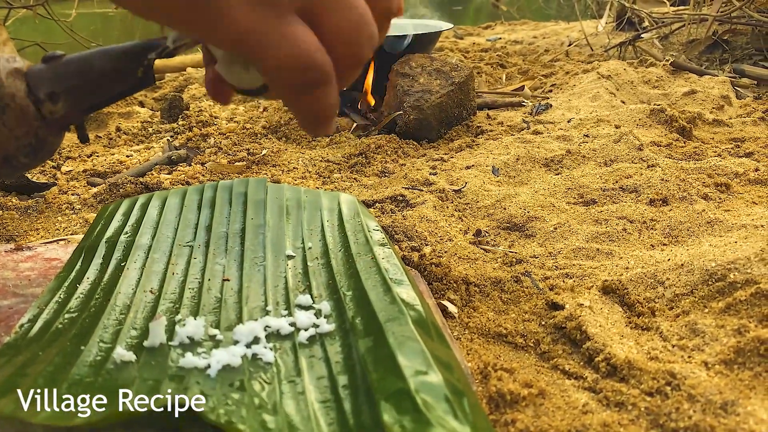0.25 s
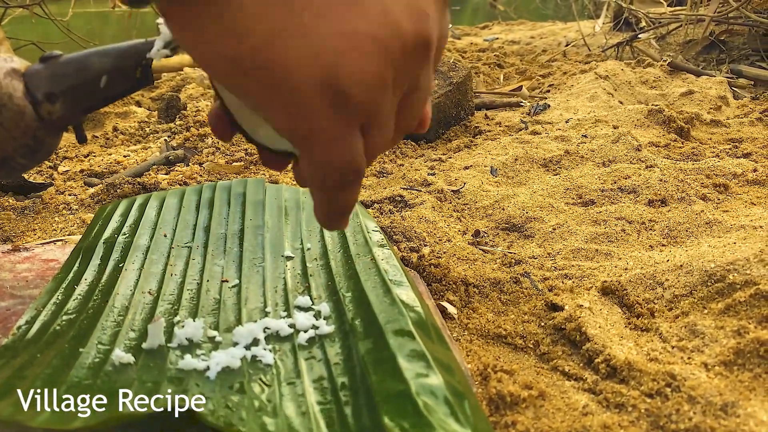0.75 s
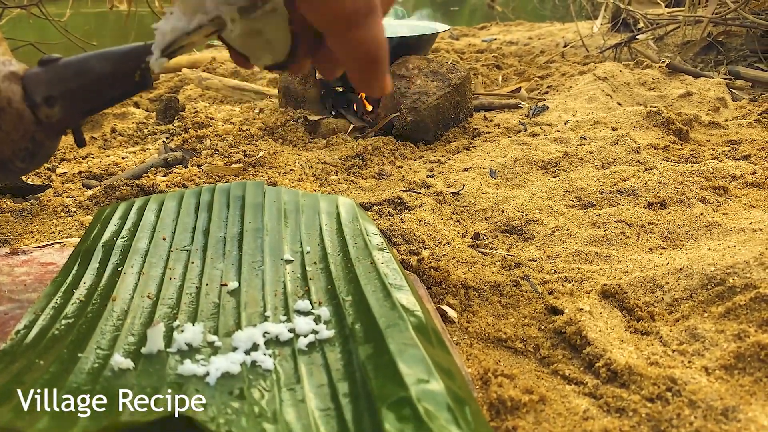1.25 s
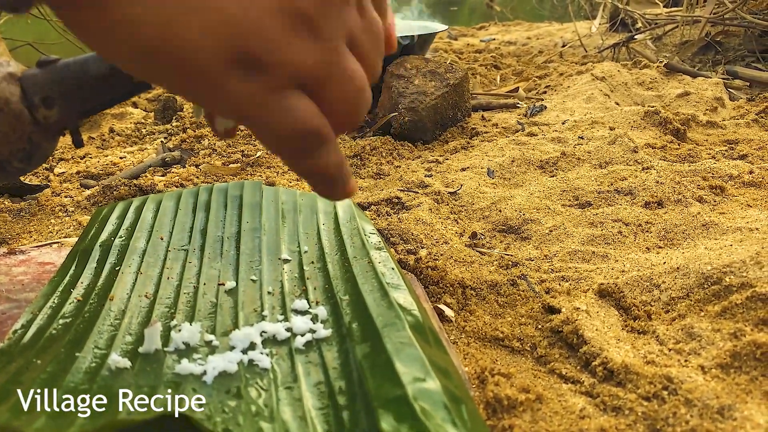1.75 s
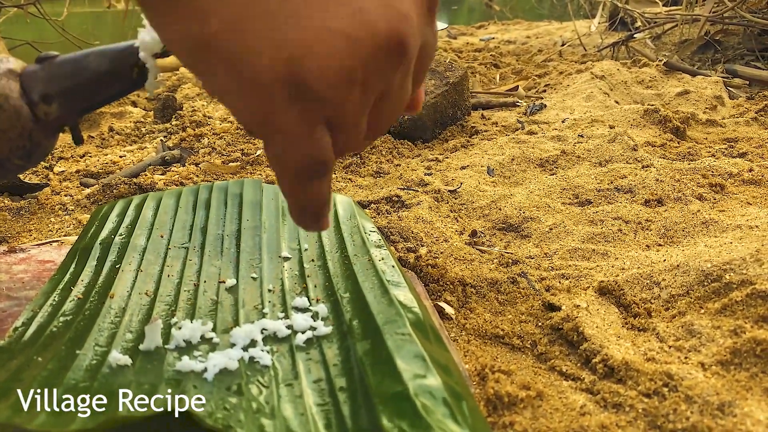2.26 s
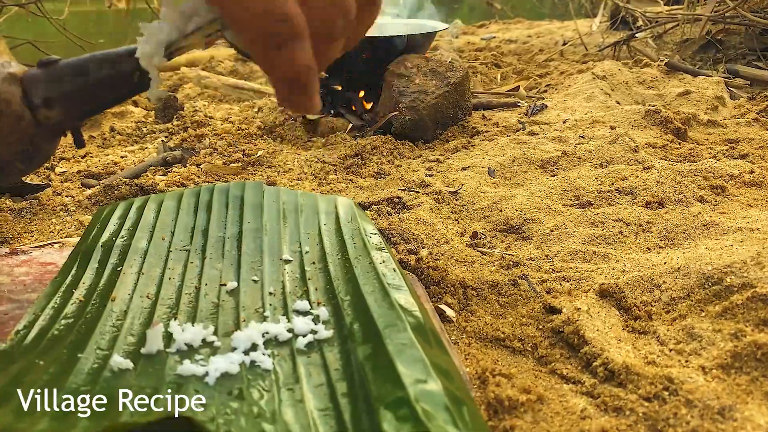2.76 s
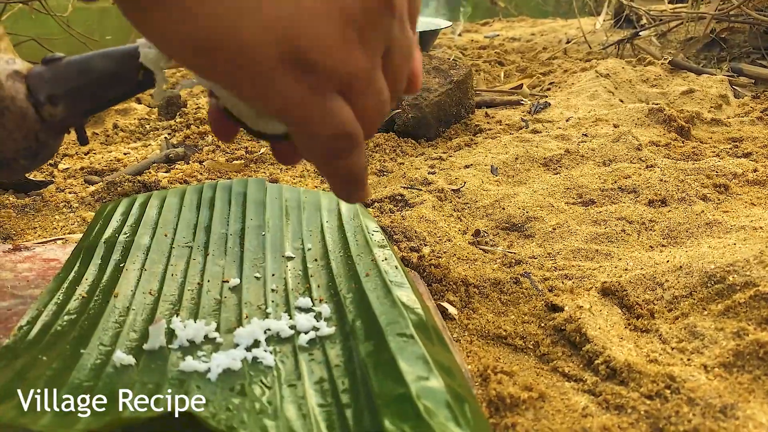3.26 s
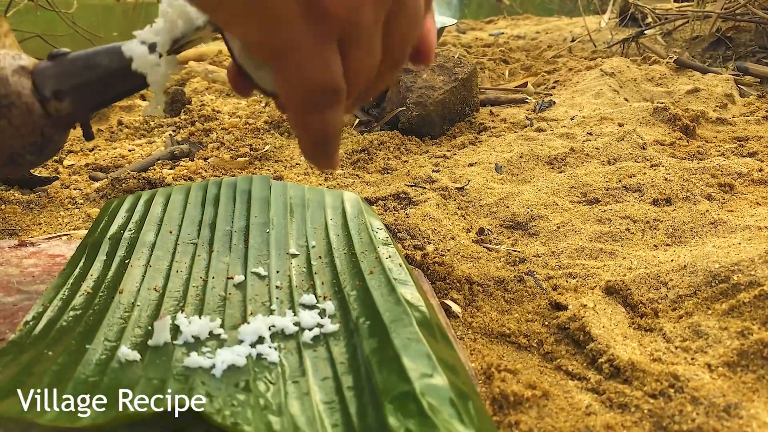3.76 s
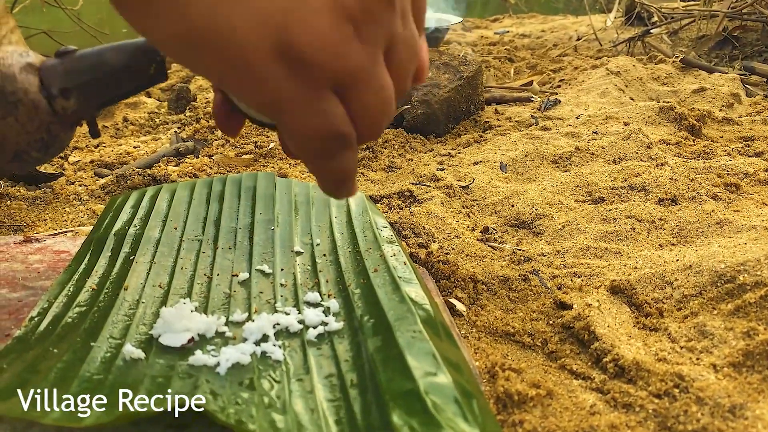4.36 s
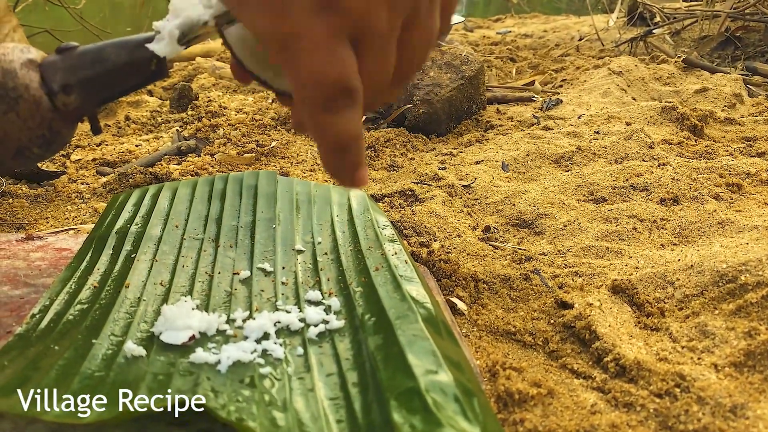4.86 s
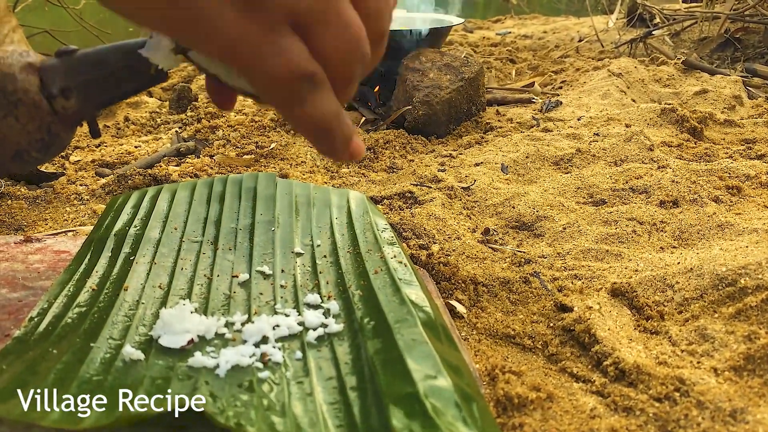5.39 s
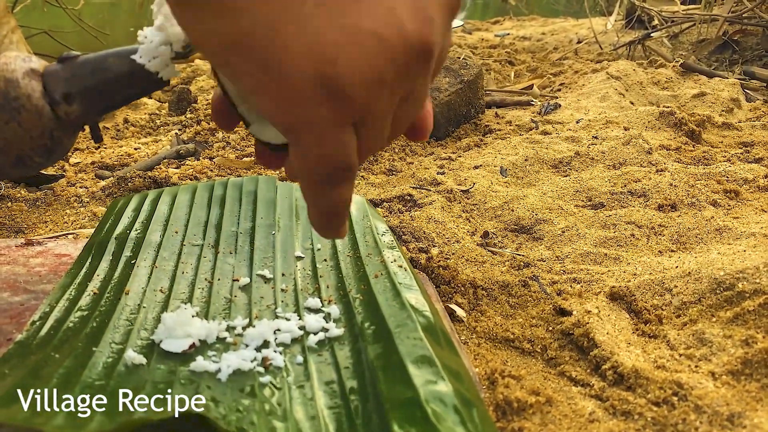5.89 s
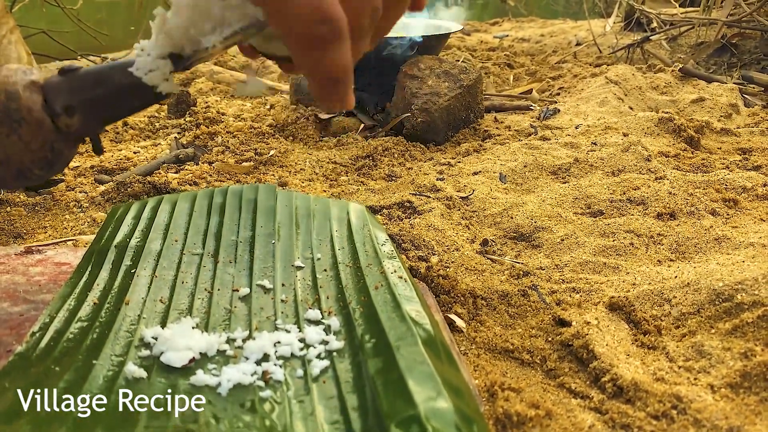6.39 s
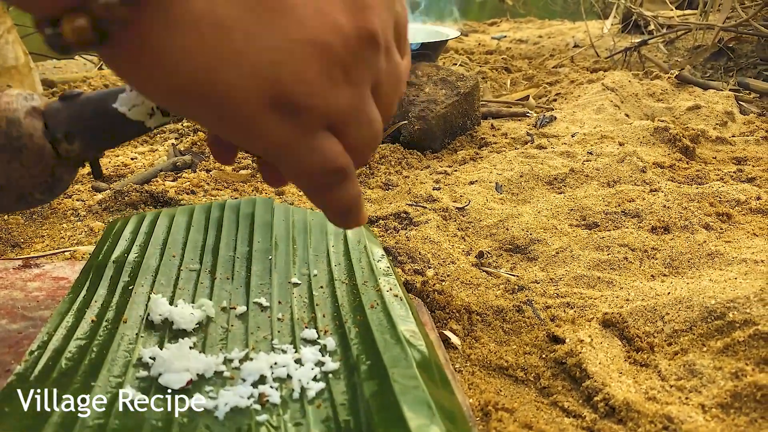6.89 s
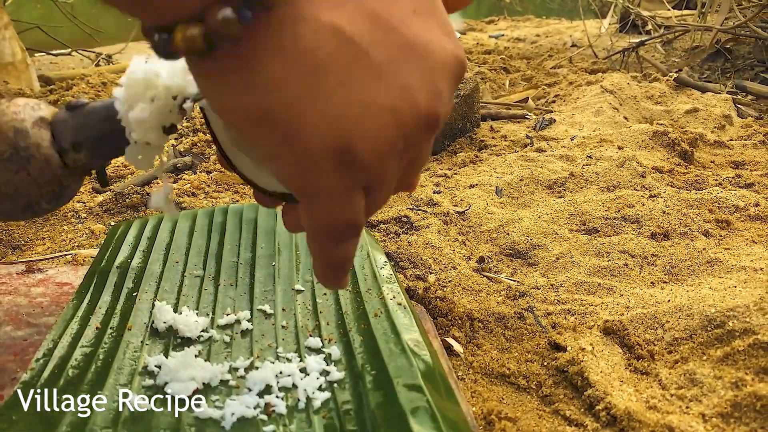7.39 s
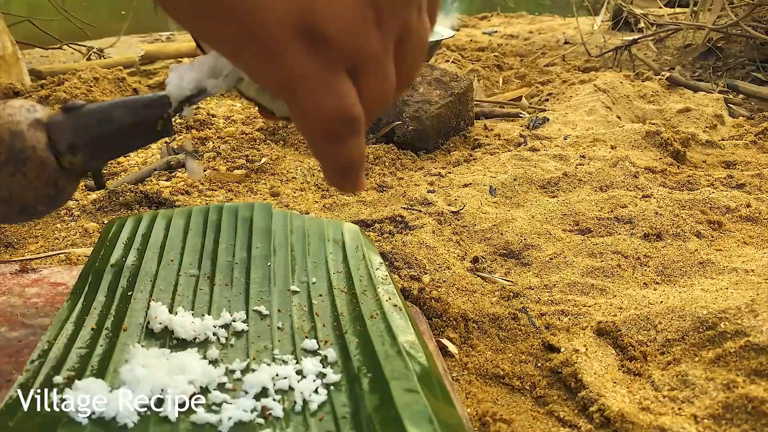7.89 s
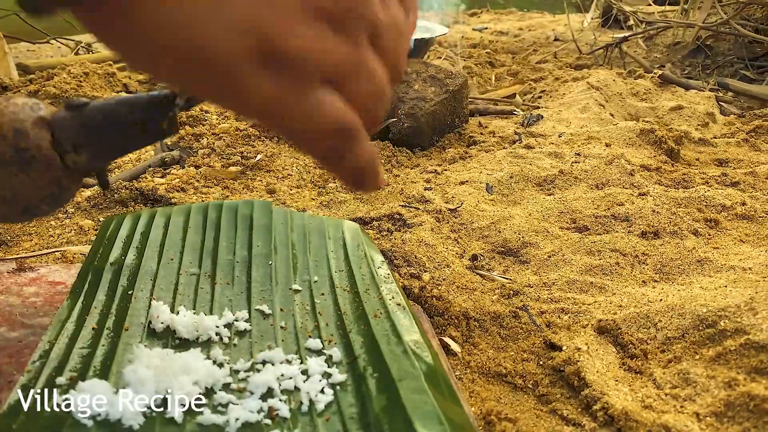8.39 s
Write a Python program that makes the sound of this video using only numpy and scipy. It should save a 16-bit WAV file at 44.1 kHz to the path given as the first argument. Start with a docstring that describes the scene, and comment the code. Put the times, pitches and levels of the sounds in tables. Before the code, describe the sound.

A hard coconut half is pushed again and again over a serrated metal scraper, close by and outdoors. Each stroke is a short, gritty, hollow rasp, nearly three a second, some catching with a woody knock. Faint ticks and rubs fill the gaps, and the stand sometimes thuds dully on sand. Close stereo microphone, dry, with a soft low air hush.

```python
"""Half a coconut is pushed down over a toothed steel scraper, nearly three strokes a second, in the open air.
The teeth stick and slip in the flesh: random impulses, shaped by the push, ring modes of shell, stand and blade.
Between strokes the shell rubs and ticks on the teeth as bursts of slips and band-passed noise.
The stand thuds on the sand as damped low modes; shaped noise makes the hush of the open air.
A close pair of microphone ports listens from the side."""
import sys
import numpy as np
from scipy import signal
from scipy.fft import rfft, irfft, next_fast_len
from scipy.io import wavfile

SR = 44100
rng = np.random.default_rng(int(sys.argv[2]) if len(sys.argv) > 2 else 0)


def unload_audio(sound):
    """Save the sound as a 16-bit wav file, at the path given as the first command line argument."""
    columns = np.transpose(np.atleast_2d(sound))
    # keep every value between -1 and 1, then stretch to whole-number steps
    steps = np.round(np.clip(columns, -1, 1) * 32767)
    wavfile.write(sys.argv[1], SR, steps.astype(np.int16))


N = 381024

# strokes: bite_s, lower_s (before bite), rise_s (to full push), ease_s, full_push_db, bite_rel_full_db,
#          eased_rel_full_db, rasp_rel_push_db, bright_db (extra treble of the rasp)
STROKES = [(0.0, 0.025, 0.029, 0.097, -16, -4.0, -17.5, -16.5, 5.5),
           (0.356, 0.0093, 0.033, 0.097, -13.5, -9.5, -15.0, -19.0, 5.5),
           (0.724, 0.019, 0.033, 0.081, -10.5, -13, -15.5, -18.5, 3),
           (1.077, 0.016, 0.062, 0.064, -11, -9.5, -15.0, -21.0, -3),
           (1.451, 0.014, 0.044, 0.071, -12, -15.5, -14, -19.0, 4),
           (1.803, 0.023, 0.072, 0.056, -15.5, -8.5, -13.5, -17.5, 1.5),
           (2.162, 0.019, 0.059, 0.079, -14, -11.5, -13, -17.5, 1),
           (2.532, 0.022, 0.038, 0.096, -12, -15, -16.5, -18, 0.8),
           (2.887, 0.022, 0.052, 0.094, -12, -15.5, -16, -17.5, 2),
           (3.264, 0.022, 0.077, 0.063, -15, -7, -15.0, -18.5, -3.7),
           (3.61, 0.023, 0.096, 0.039, -11, -13, -25, -19, -4.5),
           (3.973, 0.025, 0.09, 0.062, -13, -14, -13.5, -18.5, -0.5),
           (4.353, 0.023, 0.074, 0.074, -15.5, -3.5, -14.5, -19, 0.5),
           (4.725, 0.022, 0.069, 0.067, -12.5, -9.5, -18, -20, -2),
           (5.079, 0.021, 0.04, 0.11, -12.5, -13.5, -16.5, -18.5, 0),
           (5.456, 0.025, 0.095, 0.032, -11.5, -7.5, -17, -18, -4),
           (5.825, 0.02, 0.058, 0.082, -11.5, -8.5, -18, -17, -4),
           (6.186, 0.023, 0.052, 0.07, -9.5, -12.5, -14, -16.5, 1),
           (6.553, 0.025, 0.046, 0.095, -11.5, -11, -14.5, -16.5, -2.8),
           (6.921, 0.019, 0.065, 0.08, -12.0, -11.5, -14, -17.0, -1.8),
           (7.32, 0.019, 0.053, 0.06, -10.0, -10, -16, -18.5, -10),
           (7.693, 0.021, 0.048, 0.084, -9, -19.5, -19, -17, -2.5),
           (8.073, 0.024, 0.066, 0.076, -11.0, -13.5, -16.5, -17.5, -5),
           (8.463, 0.023, 0.042, 0.12, -13.5, -15, -13, -16, -3.3)]
# teeth catching hard in the flesh: start_s, knock_db, crack_rel_knock_db
CATCHES = [(0.356, -11, -12.5), (0.719, -2.5, -13), (0.736, 0.5, -33), (1.071, -9, -7), (1.105, -5, -37),
           (1.449, -5, -7), (1.488, 1.5, -8.5), (2.571, -11, -41), (2.606, -5, -22), (3.611, -27.5, 0),
           (3.624, -1.5, -31.5), (3.755, 3, -17.5), (4.058, -2, -25), (4.419, -19.5, -36), (4.75, -4, -9.5),
           (4.788, -1.5, -46), (5.457, -18, -27), (5.819, -7.5, -49), (5.86, 1.5, -29.5),
           (6.213, -4.5, -33), (6.563, -3.5, -29), (6.6, 1, -29), (6.957, -9, -24.5), (6.979, -1, -37),
           (7.329, -16.5, -17), (7.722, 3, -34.5), (8.114, 0, -36), (8.462, -12.5, -26), (8.489, 0, -11)]
# light ticks of shell on teeth between strokes: start_s, level_db, pitch_hz, body_rel_tick_db
TOUCHES = [(0.5771, -58.5, 1800, 21), (1.3433, -58, 1195, 17), (1.694, -45, 1570, 0),
           (1.7074, -48, 1210, 2), (1.7384, -51, 1570, 7), (1.9582, -39, 4220, -11),
           (1.9794, -39.5, 1490, -10), (2.6918, -33.5, 1400, -9.5), (2.818, -42, 2330, -8),
           (5.3712, -37, 1270, -13), (5.9599, -55.5, 4030, 6), (6.002, -38.5, 2900, 9),
           (6.0854, -31, 1410, -16), (6.3999, -34, 1350, -32), (6.8105, -41.5, 2100, -9),
           (7.2799, -43.5, 3490, -8), (7.544, -49.5, 2600, -12)]
# light rubs of shell along teeth: start_s, length_s, rasp_db, push_rel_rasp_db
RUBS = [(0.2957, 0.064, -56, 11.5), (0.6355, 0.088, -58.5, 14.5), (1.0176, 0.053, -52.5, 5),
        (1.36, 0.058, -65, 8), (1.396, 0.028, -50.5, 4), (1.965, .045, -54.5, -4), (2.0235, 0.015, -49, 13),
        (2.0617, .06, -52, -2), (2.8383, .03, -56, 1.5), (4.2822, .05, -61.5, 13),
        (5.7409, 0.03, -61.5, 6.5), (6.0975, 0.027, -50.5, -13.5), (6.4428, 0.04, -52, -5),
        (6.8214, 0.017, -52, -11), (7.2629, 0.042, -56.5, -14.5), (7.5971, 0.049, -48.5, -17)]
# dull thuds of the stand on the sand: start_s, level_db, pitch_hz
THUDS = [(0.741, -4, 61), (1.14, -18, 60.5), (1.71, -11.5, 169), (1.875, 5.5, 66.5), (2.299, -14.5, 59.2),
         (2.6, -4.5, 59), (3.58, -7, 61), (5.51, -4.5, 59.7), (5.861, -3.5, 60.4), (7.83, -4, 73.4),
         (7.87, -8.5, 56)]
# modes of shell, its air and the stand: pitch_hz, width_hz (per resonance pass), level_db
SHELL_MODES = [(62, 65, -23), (158, 49, -10.5), (250.4, 136, -3), (368, 194, 0), (466.6, 255, 2.5),
               (640, 580, -19), (804, 130, -16), (1220, 180, -16.5), (1618, 120, -11), (1821, 180, -11)]
# modes of blade and hard shell: pitch_hz, width_hz (per resonance pass), level_db
BLADE_MODES = [(2320, 500, -18), (2906, 290, -6.5), (3340, 350, -3), (4040, 760, -1.5), (4733, 600, -6),
               (5640, 570, -8.5), (6260, 250, -12.5), (7200, 1300, -7.5), (8400, 3700, -10.5),
               (10600, 1800, -21), (14000, 3500, -32.5)]
# spectral shape of the open-air hush: freq_hz, relative_density_db
AIR_SHAPE = [(15, -40.5), (25, -6.5), (74, 17), (488, -5.5), (797, -12), (1010, -4), (1520, -16),
             (2680, -17), (3300, -26.5), (7160, -40.5), (12000, -42.5), (15600, -72), (22000, -120)]
# phase by which the left port, nearer the scraper, leads: freq_hz, lead_rad
PORT_LEAD = [(0, 0), (200, 0.44), (500, 0.7137), (1290, 1.55), (1640, 3.5), (2070, 4), (2600, 8.0),
             (4000, 7.5), (5000, 5.6), (6000, 5.5), (16000, 8)]
# left port level against right: freq_hz, left_rel_right_db
PORT_LEVEL = [(60, 0.5), (110, 0.0), (200, 1), (380, 1.5), (700, 5), (1290, 2.5), (2380, 3.5), (4400, 3),
              (8120, -4), (15000, 1.5)]

# contact stages: push against full push, and extra rasp
HOVER_S, HOVER_DB, LOWER_DB = 0.012, -49, -33
LIFT_S, LIFT_DB = 0.038, -41.5
CLEAR_S, CLEAR_DB = 0.059, -69
RASP_LOWERED_DB, RASP_BITE_DB, RASP_EASED_DB, RASP_LIFTED_DB = 9.5, 1.5, -1.5, 7
TOUCH_OCTAVES, TOUCH_T60_S, TOUCH_SPAN_S = 1.05, 0.037, 0.1
RUB_RISE_S, RUB_T60_S, RUB_SPAN_S = 0.004, 0.08, 0.25
BRUSH_DB, BRUSH_SWING_DB = -66, 3  # before its gain into each body
THUD_WIDTH_SHARE = 0.33  # width per resonance pass / pitch
AIR_DB, AIR_SWING_DB = -61, 1.5
CUTOFF_HZ = 15750


def amp(db):
    """Amplitude from dB."""
    return 10 ** (np.asarray(db) / 20)


def rms_one(x):
    """Scale to rms 1."""
    return x / np.sqrt(np.mean(np.abs(x) ** 2) + 1e-20)


def in_time(rows):
    """Table columns joined by straight lines; first column is time in s."""
    s, *columns = np.transpose(rows)
    return np.array([np.interp(np.arange(N) / SR, s, c) for c in columns])


def drift(rate_hz):
    """Slow random drift, rms 1: two-pole low-passed noise, drawn at every 20th sample."""
    step, settle = 20, 2000
    pole = np.exp(-2 * np.pi * rate_hz * step / SR)
    noise = rng.standard_normal(N // step + settle + 2)
    slow = signal.lfilter([1], [1, -2 * pole, pole * pole], noise)[settle:]
    return np.interp(np.arange(N) / step, np.arange(len(slow)), rms_one(slow))


def slips(per_s, spread_db):
    """Stick-slip releases: impulses at random times, of uneven size and sign; rms 1."""
    excess_db = spread_db * np.minimum(rng.exponential(1, N), 4.2)
    sizes = amp(excess_db) * rng.choice([-1, 1], N)
    happens = rng.random(N) < per_s / SR
    return rms_one(sizes * happens)


def clicks(times_s, levels_db):
    """One impulse at each time."""
    out = np.zeros(N)
    np.add.at(out, (np.asarray(times_s) * SR).astype(int), amp(levels_db))
    return out


def dying(impulses, time_s):
    """Each impulse sets in at once and decays exponentially; time_s is the 1/e time."""
    return signal.lfilter([1], [1, -np.exp(-1 / (time_s * SR))], impulses)


def ring(force, hz, width_hz, db):
    """One damped mode with steep flanks: a resonance applied twice."""
    r = np.exp(-np.pi * width_hz / SR)
    top = (1 - r * r) / 2
    section = [top, 0, -top, 1, -2 * r * np.cos(2 * np.pi * hz / SR), r * r]
    return amp(db) * signal.sosfilt([section, section], force) / np.sqrt(top)


def air():
    """Hush of shaped noise, partly alike at both ports, its level drifting slightly."""
    hz, level_db = np.transpose(AIR_SHAPE)
    bins_hz = np.fft.rfftfreq(N, 1 / SR)
    shape = amp(np.interp(np.log(bins_hz + 1), np.log(hz), level_db))
    common, left, right = irfft(shape * rfft(rng.standard_normal((3, N))), N)
    hush = rms_one(common + 0.36 * np.array([left, right]))
    return amp(AIR_DB + AIR_SWING_DB * drift(4)) * hush


def stand():
    """Soft pushes into the stand ring low modes; the sand damps them."""
    return sum(ring(clicks([s], db), hz, THUD_WIDTH_SHARE * hz, db=1) for s, db, hz in THUDS)


def ports(x):
    """Each port hears the source with its own level and phase: half the difference up, half down."""
    size = next_fast_len(N + 2048)
    hz = np.fft.rfftfreq(size, 1 / SR)
    half = np.array([[0.5], [-0.5]])
    level_hz, left_db = np.transpose(PORT_LEVEL)
    level_db = np.interp(np.log(hz + 1), np.log(level_hz), left_db)
    lead_rad = np.interp(hz, *np.transpose(PORT_LEAD))
    response = amp(half * level_db) * np.exp(1j * half * lead_rad)
    return irfft(rfft(x, size) * response, size)[:, :N]


def touches():
    """Each touch is a decaying noise tick in a band around its pitch, plus its unfiltered force on the shell."""
    age_s = np.arange(round(TOUCH_SPAN_S * SR)) / SR
    edge = 2 ** (TOUCH_OCTAVES / 2)
    ticks, under = np.zeros(N), np.zeros(N)
    for s, db, hz, body_db in TOUCHES:
        rustle = amp(db - 60 * age_s / TOUCH_T60_S) * rng.standard_normal(len(age_s))
        band = signal.butter(2, [hz / edge, hz * edge], "band", fs=SR, output="sos")
        at = round(s * SR)
        span = slice(at, at + len(age_s))
        ticks[span] += signal.sosfilt(band, rustle) / np.sqrt(edge - 1 / edge)
        under[span] += amp(body_db) * rustle
    return ticks, under


def rubs():
    """Push and rasp envelopes of the rubs: each sets in quickly, holds unevenly and fades."""
    t = np.arange(N) / SR
    force = np.zeros((2, N))
    for s, length_s, db, push_db in RUBS:
        span = slice(round(s * SR), round((s + RUB_SPAN_S) * SR))
        age_s = t[span] - s
        fade_db = 60 * np.maximum(age_s - length_s, 0) / RUB_T60_S
        rise = np.clip(age_s / RUB_RISE_S, 0, 1)
        force[:, span] += rise * amp(db - fade_db + np.array([[push_db], [0]]))
    return force * amp(2.5 * drift(30))


def contact():
    """Push, rasp-to-push and brightness in dB; light contact mostly rasps more per push than full contact."""
    rows = []
    for bite, lower, rise, ease, full_db, bite_db, eased_db, rasp_db, bright_db in STROKES:
        full = bite + rise
        eased = full + ease
        lifted = eased + LIFT_S
        stages = [(bite - lower - HOVER_S, HOVER_DB, RASP_LOWERED_DB),
                  (bite - lower, LOWER_DB, RASP_LOWERED_DB),
                  (bite, bite_db, RASP_BITE_DB),
                  (full, 0, 0),
                  (eased, eased_db, RASP_EASED_DB),
                  (lifted, LIFT_DB, RASP_LIFTED_DB),
                  (lifted + CLEAR_S, CLEAR_DB, RASP_LIFTED_DB)]
        rows += [(s, full_db + db, rasp_db + extra_db, bright_db) for s, db, extra_db in stages]
    return in_time(rows)


def body(modes, envelope, shared, blows, own_share, per_s, patchy_db):
    """Teeth bite at many shifting spots: each mode gets common slips, slips of its group, and the blows."""
    others = [slips(per_s, spread_db=3.0) for _ in range(3)]
    forces = [np.sqrt(1 - own_share) * shared + np.sqrt(own_share) * other for other in others]
    out = np.zeros(N)
    for k, mode in enumerate(modes):
        patchy = envelope * amp(patchy_db * drift(21))
        out += ring(patchy * forces[k % 3] + blows, *mode)
    return out


def grating():
    """Strokes, hard catches, rubs and light touches drive the modes of shell and blade."""
    push_db, rasp_db, bright_db = contact()
    s, knock_db, crack_db = np.transpose(CATCHES)
    knocks, cracks = clicks(s, knock_db), clicks(s, knock_db + crack_db)
    rub_push, rub_rasp = rubs()
    ticks, under = touches()
    shared = slips(1000, spread_db=5.0)
    brush = amp(BRUSH_DB + BRUSH_SWING_DB * drift(3))  # faint, comes and goes

    # stick and slip makes the force come in bursts
    judder = amp(1.1 * drift(54))
    # single teeth snap free
    snaps = dying(np.abs(slips(110, spread_db=2.0)), time_s=0.0011)
    teeth = 1.013 + 0.4 * rms_one(snaps)
    # a catch tears on for a moment
    push = judder * (amp(push_db) + amp(-8.5) * rub_push)
    push = push + amp(-15.5) * dying(knocks, time_s=0.0059)
    rasp = judder * teeth * amp(push_db + rasp_db)
    rasp = rasp + amp(-13.5) * dying(cracks, time_s=0.0032)

    shell_blows = amp(6) * knocks + amp(-9.5) * under
    shell = body(SHELL_MODES, push + amp(-9.5) * brush, shared, shell_blows,
                 own_share=0.69, per_s=1600, patchy_db=2.5)
    blade = body(BLADE_MODES, rasp, shared, amp(1.5) * cracks, own_share=0.62, per_s=5000, patchy_db=3.0)
    treble = signal.sosfilt(signal.butter(2, 6500, "high", fs=SR, output="sos"), blade)
    blade = blade + (amp(bright_db) - 1) * treble

    # rubs and cracks also ring the thin rim of the shell
    rim_force = teeth * (amp(3.0) * rub_rasp + amp(-1.5) * rub_push)
    shell = shell + body(SHELL_MODES[6:], rim_force, shared, amp(4) * cracks,
                         own_share=0.5, per_s=730, patchy_db=2.0)
    # a light contact is soft and rings only the freest modes of the blade
    light_force = teeth * (amp(-5.5) * rub_rasp + amp(-18.0) * brush)
    blade = blade + body(BLADE_MODES[2:5], light_force, shared, 0,
                         own_share=0.46, per_s=900, patchy_db=0.5)
    # teeth on the far rim ring the middle modes of the blade in opposite sense at the two ports
    far_rim = body(BLADE_MODES[1:8], rasp, shared, 0, own_share=1, per_s=4000, patchy_db=3.5)

    alike = amp(-2.5) * shell + amp(-3.0) * blade + amp(4) * ticks
    return ports(alike + amp(-9.0) * far_rim * [[1], [-1]])


def scene():
    """Open air, thuds of the stand, and the grating."""
    return air() + stand() + grating()


def record(dry):
    """Deepest bass cut, treble dulled, peaks rounded, then a steep cut of the top."""
    low_cut = signal.sosfilt(signal.butter(3, 45, "high", fs=SR, output="sos"), dry)
    dull = signal.sosfilt(signal.butter(2, 9000, fs=SR, output="sos"), low_cut)
    rounded = 0.95 * np.tanh(dull / 0.95)
    return signal.sosfilt(signal.cheby2(16, 60, CUTOFF_HZ, fs=SR, output="sos"), rounded)


dry = scene()
out = record(dry)
unload_audio(out)
```